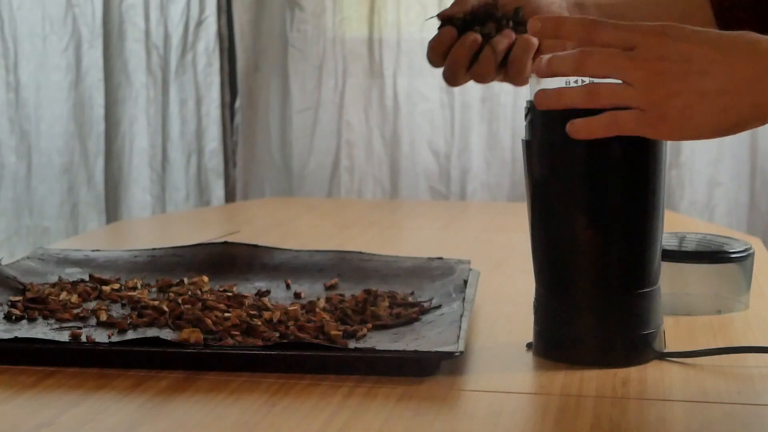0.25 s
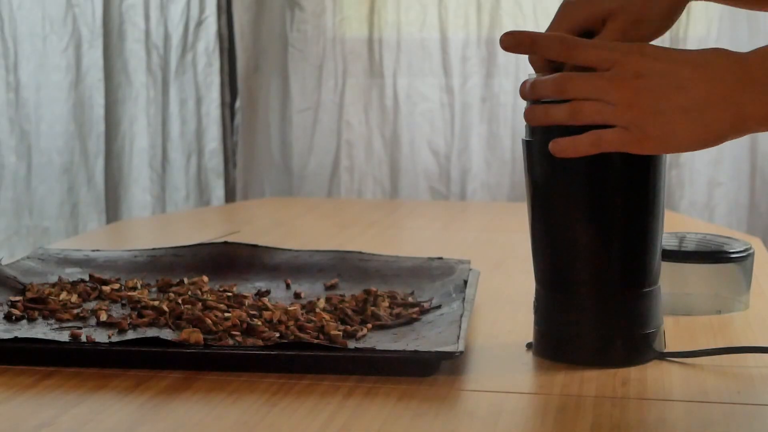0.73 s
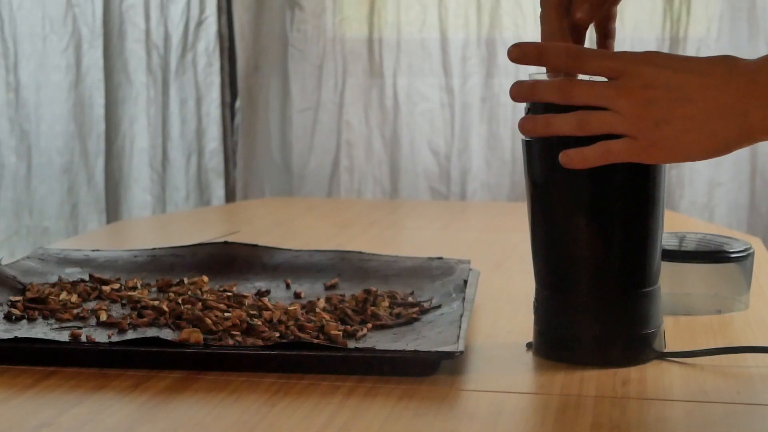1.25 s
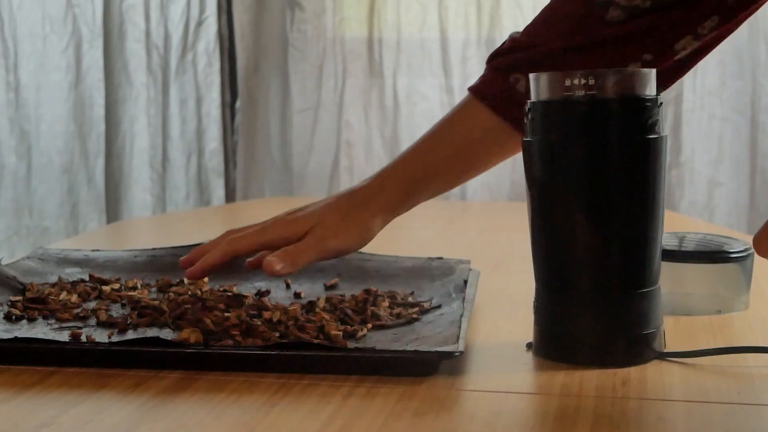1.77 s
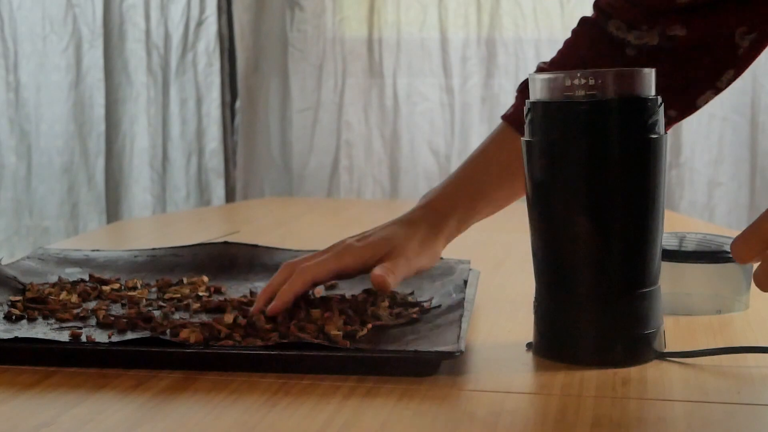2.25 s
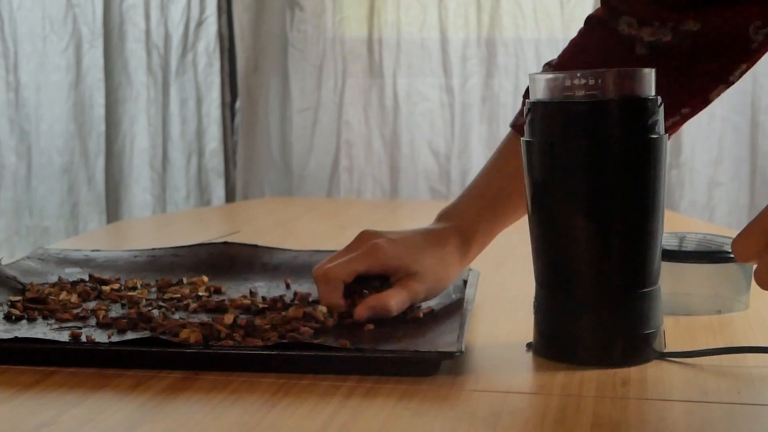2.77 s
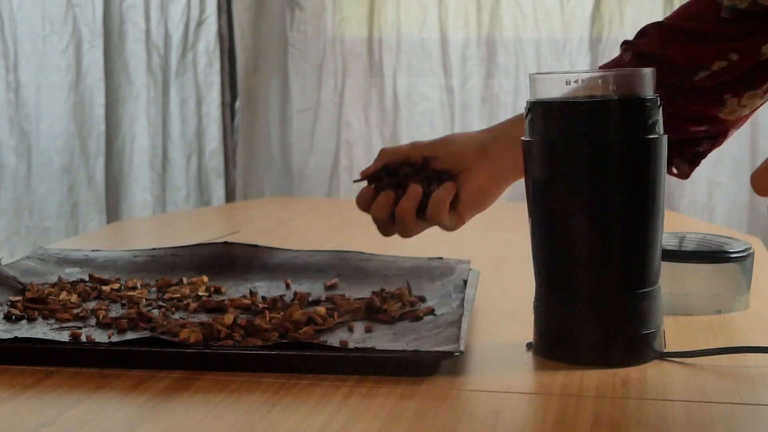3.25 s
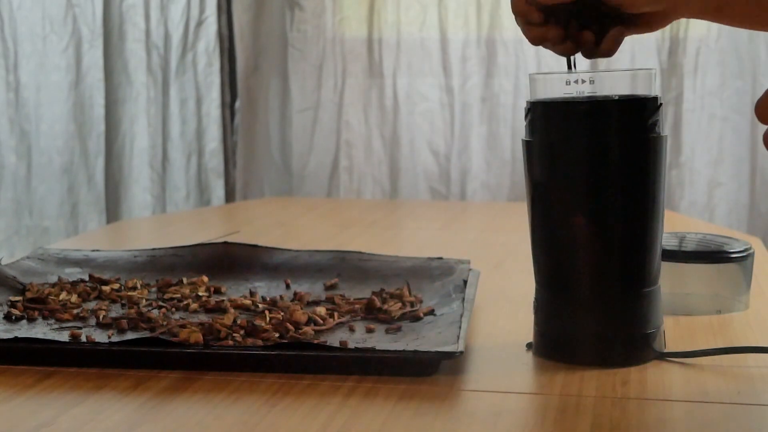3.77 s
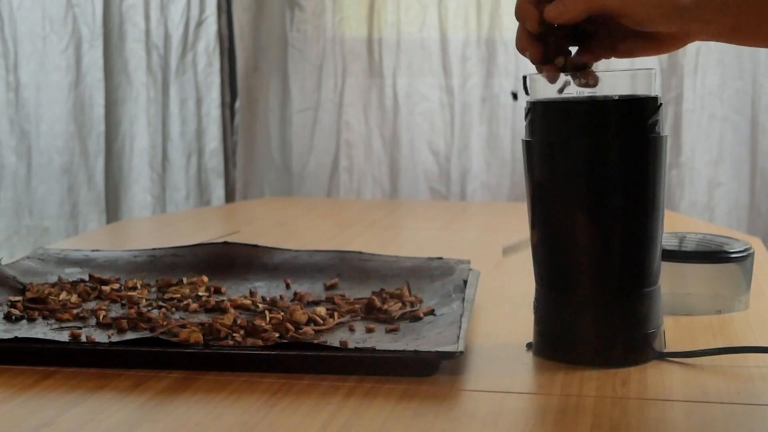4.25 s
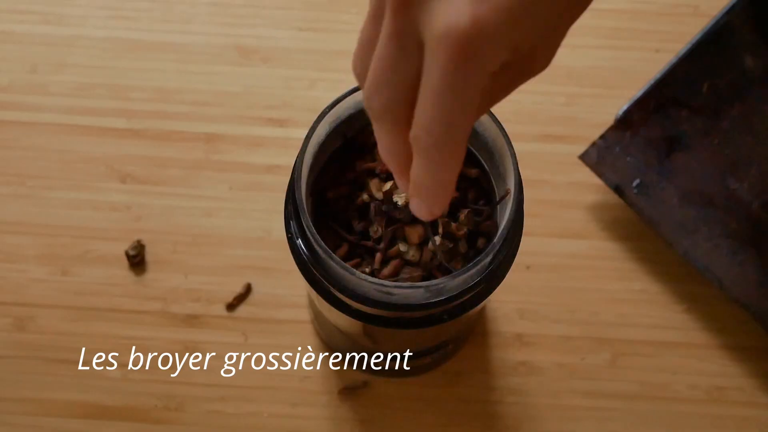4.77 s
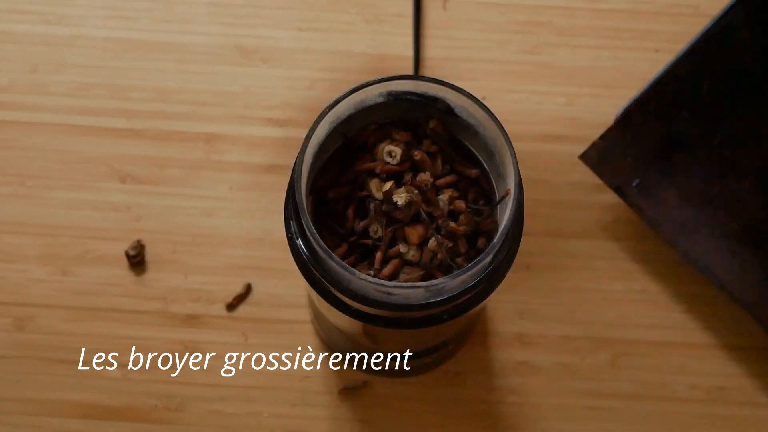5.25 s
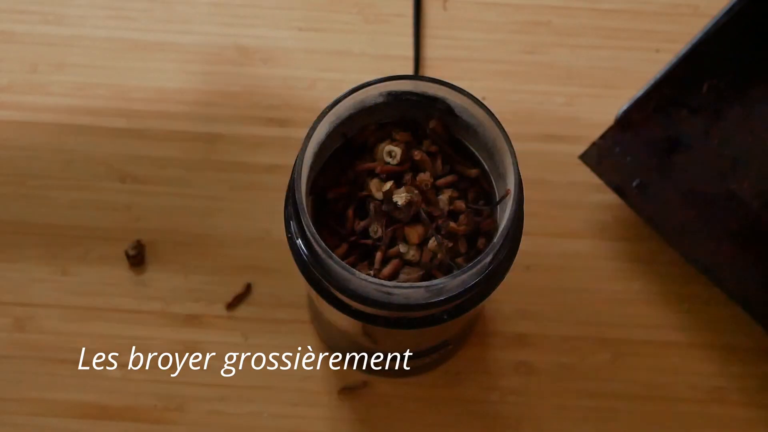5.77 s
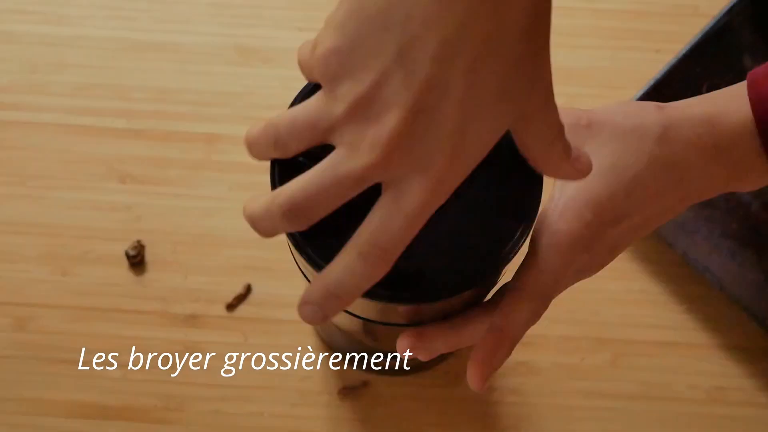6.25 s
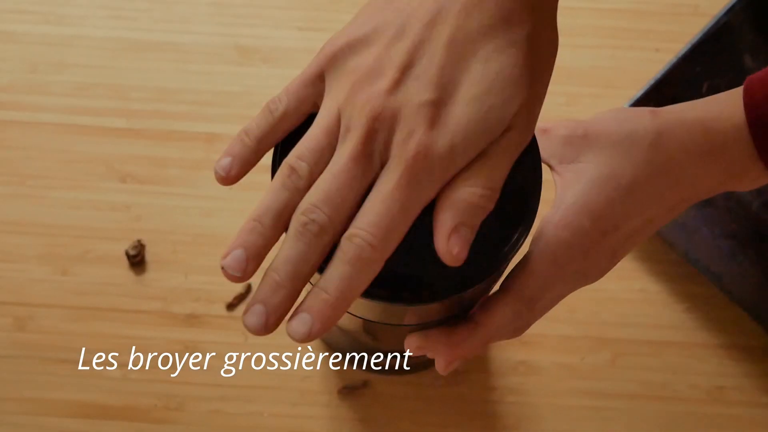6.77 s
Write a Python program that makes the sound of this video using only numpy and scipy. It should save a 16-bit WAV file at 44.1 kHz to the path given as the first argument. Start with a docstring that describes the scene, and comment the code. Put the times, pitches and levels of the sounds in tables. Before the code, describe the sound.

Dry twiggy bits tick and patter into a metal cup, rustle across a tray, bounce on wood, then a hollow lid knocks and snaps shut.

```python
"""Quiet room air and a soft brush of sleeve, then dried root pieces drop by hand into a grinder's steel cup.
A hand sweeps more across a tray and pours them in; strays tick and bounce on the wooden table.
A faint whine joins, the heap crunches, then the plastic lid hoots on the wood, knocks, scrapes and claps home.
Impacts and random grains drive the resonances of cup, tray, board and lid; single pieces are short decaying
sines; the hoot is a sine with one overtone and rubbing noise; air and whine are filtered noise in a live room."""
import sys
import numpy as np
from scipy import signal
from scipy.fft import rfft, irfft
from scipy.io import wavfile

SR = 44100
rng = np.random.default_rng(int(sys.argv[2]) if len(sys.argv) > 2 else 0)


def transcribe(u):
    """Save the signal u as a 16-bit wav file named by the first command-line argument.

    u: samples, shape (n,) or (channels, n), limited to [-1, 1]; the rate is SR.
    q: integer samples, one column per channel.
    """
    v = np.clip(np.atleast_2d(u).T, -1, 1)
    q = np.round(v * 32767).astype(np.int16)
    wavfile.write(sys.argv[1], SR, q)


N = 309141
TIME = np.arange(N) / SR
HIT_ENERGY = 0.004 * SR   # samples in 4 ms: a hit at 0 dB has the energy of rms 1 held for 4 ms


def from_db(db):
    """Decibels to gain."""
    return 10 ** (np.asarray(db) / 20)


def at_hz(points, hz):
    """Read a table on a log-frequency axis."""
    f, value = np.transpose(points)
    return np.interp(np.log(hz + 1e-3), np.log(f), value)


def envelope(rows):
    """Gain that follows a curve of (t/s, level/dB), silent outside it."""
    s, level_db = np.transpose(rows)
    inside = (TIME >= s[0]) & (TIME <= s[-1])
    return from_db(np.interp(TIME, s, level_db)) * inside


def unit(x):
    """Scale to energy 1."""
    return x / np.sqrt(np.sum(x ** 2) + 1e-20)


def body(spectrum, modes=(), size=8192):
    """Causal (minimum-phase) response of an object: a broad colour lifted at its resonances."""
    hz = np.fft.rfftfreq(size, 1 / SR)
    level = from_db(at_hz(spectrum, hz))
    for centre, width, lift_db in modes:
        extra_power = from_db(lift_db) ** 2 - 1
        level = level * np.sqrt(1 + extra_power / (1 + (2 * (hz - centre) / width) ** 2))
    # folding the cepstrum onto positive time makes the response minimum-phase
    cepstrum = irfft(np.log(level))
    cepstrum[1:size // 2] *= 2
    cepstrum[size // 2 + 1:] = 0
    return unit(irfft(np.exp(rfft(cepstrum))))


def split(response, hz):
    """The low and the high part of a response, each of energy 1."""
    parts = []
    for kind in ("low", "high"):
        crossover = signal.butter(N=4, Wn=hz, btype=kind, fs=SR, output="sos")
        parts.append(unit(signal.sosfilt(crossover, response)))
    return parts


def through(x, response):
    """Pass a force or a sound through a response."""
    return signal.oaconvolve(np.atleast_2d(x), np.atleast_2d(response), axes=1)[:, :N]


def grains(per_s, spread_db, clump_db=1.5, clumps_per_s=40):
    """Random tiny contacts of uneven size that come in clumps; rms 1."""
    sizes = from_db(spread_db * np.minimum(rng.exponential(1, N), 4))
    signs = rng.choice([-1, 1], N)
    clumps = np.interp(TIME * clumps_per_s, np.arange(1000), rng.standard_normal(1000))
    touching = rng.random(N) < per_s / SR
    return unit(sizes * signs * from_db(clump_db * clumps) * touching) * np.sqrt(N)


def clicks(times, levels_db):
    """One impulse of force per contact."""
    force = np.zeros(N)
    force[np.round(np.asarray(times) * SR).astype(int)] = from_db(levels_db) * np.sqrt(HIT_ENERGY)
    return force


def blows(rows, response, split_hz, rough, contact_s, rattle_s, size=4096):
    """Each blow is an impact, a rough contact of milliseconds, and a dying rattle of small contacts."""
    t, force = np.arange(size) / SR, np.zeros((2, N + size))
    for s, body_db, crack_db, rattle_db in rows:
        grit, bounces = rng.standard_normal((2, size))
        impact = np.sqrt(1 - rough) * (t == 0)
        scuff = np.sqrt(rough) * unit(grit * np.exp(-t / contact_s))
        rattle = from_db(rattle_db) * unit(bounces ** 3 * np.exp(-t / rattle_s))
        at = round(s * SR)
        # body drives the response below split_hz, crack drives it above
        strength = from_db([[body_db], [crack_db]]) * np.sqrt(HIT_ENERGY)
        force[:, at:at + size] += strength * (impact + scuff + rattle)
    return through(force[:, :N], split(response, split_hz)).sum(axis=0)


def bouncing(rows, loss_db, rattle_db):
    """A piece touches down and rattles; where a gap is given it touches a second time."""
    first = [(s, body_db, crack_db, rattle_db) for s, body_db, crack_db, gap in rows]
    second = [(s + gap, body_db - loss_db, crack_db - loss_db, rattle_db)
              for s, body_db, crack_db, gap in rows if gap > 0]
    return first + second


def pings(times, pitches_hz, levels_db, cycles, size=2048):
    """Single pieces of wood, each ringing for a few cycles at its own pitch."""
    t, out = np.arange(size) / SR, np.zeros(N + size)
    for s, hz, db in zip(times, pitches_hz, levels_db):
        at = round(s * SR)
        ring = unit(np.sin(2 * np.pi * hz * t) * t * np.exp(-hz * t / cycles))
        out[at:at + size] += from_db(db) * ring * np.sqrt(HIT_ENERGY)
    return out[:N]


def pan(x, left_db):
    """Place a sound between the channels; left_db is left minus right."""
    return x * from_db([[left_db / 2], [-left_db / 2]])


# decay time of the room: (f/Hz, t60/s)
ROOM_DECAY = [(150, 0.5), (700, 0.36), (2000, 0.33), (4000, 0.35), (10000, 0.26), (15000, 0.22)]
# reverberant over direct sound, before each source's own wet level: (f/Hz, level/dB)
ROOM_COLOUR = [(100, -2), (300, 1.5), (700, 3.5), (3000, 1), (10000, 1.5), (15000, -1)]
# how alike the reflections are left and right: (f/Hz, likeness 0 to 1)
ROOM_ALIKE = [(150, 0.9), (700, 0.52), (2000, .68), (10000, 0.52)]


def room(x, wet_db, first_s=0.0014, build_s=0.0018, size=26460):
    """Direct sound, then reflections that thicken within milliseconds and die band by band."""
    t, hz = np.arange(size) / SR, np.fft.rfftfreq(size, 1 / SR)
    white, response = rfft(rng.standard_normal((2, size))), np.zeros((2, size))
    swell = 1 - np.exp(-np.maximum(t - first_s, 0) / build_s)
    edges = 62.5 * 2 ** np.arange(0, 8.5, .5)   # half-octave bands
    for low, high in zip(edges, edges[1:]):
        centre = np.sqrt(low * high)
        band = irfft(white * ((hz >= low) & (hz < high)), size)
        mid, side = band * swell * 1e-3 ** (t / at_hz(ROOM_DECAY, centre))
        alike = at_hz(ROOM_ALIKE, centre)
        tail = np.sqrt(1 + alike) * unit(mid) + np.sqrt(1 - alike) * unit(side) * [[1], [-1]]
        response += tail * from_db(wet_db + at_hz(ROOM_COLOUR, centre)) * np.sqrt((high - low) / SR)
    response[:, 0] += 1   # direct sound
    return through(x, response)


# relative colour of the room air: (f/Hz, level/dB)
AIR_COLOUR = [(15, -66), (25, -21), (80, -18.5), (120, -8.5), (256, -6), (326, -3.5), (714, -2.5),
              (1160, -4.5), (1260, -9.5), (1480, -10.5), (2480, -7.5), (4370, -19.5), (4870, -18),
              (14800, -27), (16000, -58)]
# resonances in the room air: (f/Hz, width/Hz, lift/dB)
AIR_RESONANCES = [(932, 156, 4.5), (1630, 260, 6.1), (2543, 140, 7.4)]
# stereo width of the air, side minus mid: (f/Hz, level/dB)
AIR_SIDE = [(60, -11), (110, 10.5), (200, 12.5), (380, 10), (700, 4), (1290, 1), (2380, -2), (4400, -2),
            (8120, -4), (15000, -3)]
AIR_DB, WHINE_START_S = -58, 4.73


def background(later_db=1.5, fade_s=0.038):
    """Wide, quiet room air as shaped noise; later it is a little louder and the whine joins it."""
    mid, side = through(rng.standard_normal((2, N)), body(AIR_COLOUR, AIR_RESONANCES))
    side = irfft(rfft(side) * from_db(at_hz(AIR_SIDE, np.fft.rfftfreq(N, 1 / SR))), N)
    later = np.clip((TIME - WHINE_START_S) / fade_s, 0, 1)
    air = from_db(AIR_DB + later_db * later) * (mid + side * [[1], [-1]])
    return air + later * whine()


# brushes of sleeve and fingers, each swelling and fading: (middle t/s, half length/s, level/dB before trim)
BRUSHES = [(0.025, 0.1, -70), (2.793, 0.091, -58.5), (4.96, 0.036, -56), (5.062, 0.027, -62),
           (5.28, 0.19, -67.5), (5.6, 0.14, -59), (5.906, 0.21, -67), (6.023, 0.034, -57.5)]
# relative colour of cloth and skin: (f/Hz, level/dB)
SLEEVE_COLOUR = [(2060, -39), (3500, -14.5), (8100, -9.5), (10100, -3), (14700, -15.5), (15700, -25),
                 (16000, -52)]


def sleeve():
    """Cloth and skin brush softly as the hands move: dense fine contacts under smooth swells."""
    motion = sum(from_db(db) * np.exp(-((TIME - s) / half_s) ** 2) for s, half_s, db in BRUSHES)
    return from_db(-2.0) * through(motion * grains(per_s=5500, spread_db=5.5), body(SLEEVE_COLOUR))


# larger pieces landing, before trim: (t/s, body level/dB, crack level/dB, gap to second touch/s or 0)
CUP_LANDINGS = [(0.2484, -65, -49.5, 0.0099), (0.287, -46.5, -62, 0), (0.363, -66, -54, 0),
                (0.473, -51, -53, 0), (0.681, -53, -41, 0.00048), (0.6931, -33.5, -45, 0.0058),
                (0.7214, -39, -40, 0.0035), (0.8426, -37, -50, 0.00093), (0.873, -35, -42, 0),
                (0.895, -31, -29.5, 0.0117), (0.9464, -29, -32, 0), (1.1223, -31.5, -36, 0),
                (1.285, -49.5, -46.5, 0.007), (3.89, -43.5, -37, 0.0037), (3.9116, -29.5, -27, 0),
                (4.0545, -38.5, -39, 0.024), (4.149, -37.5, -33.5, 0.014), (4.2161, -39, -32, 0.015),
                (4.27, -34, -38, 0.015), (4.3203, -27, -35, 0.008), (4.6129, -37.5, -32.5, 0.012)]
# heavier chunks that sound the hollow of the cup: (t/s, f/Hz, level/dB)
HOLLOW_CHUNKS = [(0.684, 595, -52), (0.696, 640, -46.5), (0.707, 634, -53), (0.995, 626, -48),
                 (1.288, 542, -53.5)]
# fingers pressing the heap down: (t/s, body level/dB, crack level/dB, rattle level/dB over contact)
HEAP_CRUNCHES = [(4.7295, -42, -35, -8), (4.734, -31.5, -30, -4.5), (4.747, -58, -37, -9),
                 (4.774, -43, -34.5, -4)]
# relative colour of the steel cup: (f/Hz, level/dB)
CUP_COLOUR = [(100, -26), (330, -16), (560, -5.5), (880, -8), (1200, -18), (2150, -14), (2650, -1),
              (3700, 0.5), (5000, -9), (7500, -5.5), (10200, -2), (12500, -10), (16000, -32)]
# resonances of the steel cup: (f/Hz, width/Hz, lift/dB)
CUP_RESONANCES = [(2650, 38, 7), (2930, 200, 1), (3430, 294, 2.5), (8750, 320, -1)]


def cup():
    """Larger pieces land one by one on steel, chunks knock hollowly, and the heap crunches under the fingers."""
    steel = body(CUP_COLOUR, CUP_RESONANCES)
    touches = bouncing(CUP_LANDINGS, loss_db=-0.2, rattle_db=-4.0)
    landings = blows(touches, steel, split_hz=5150, rough=0.95, contact_s=0.0011, rattle_s=0.018)
    crunch = blows(HEAP_CRUNCHES, steel, split_hz=4500, rough=0.98, contact_s=0.0051, rattle_s=0.021)
    chunks = pings(*np.transpose(HOLLOW_CHUNKS), cycles=1.9)
    return pan(from_db(-8) * landings + crunch + chunks, left_db=.2)


# handfuls trickling into the cup: (hand opens t/s, hand is empty t/s, level/dB before trim)
HANDFULS = [(0.891, 1.046, -37), (1.346, 1.42, -65), (4.035, 4.05, -53.5), (4.175, 4.585, -46.5)]
POUR_RISE_DB_PER_S, POUR_FALL_DB_PER_S = 319, 124   # the first crumbs slip out early, the last ones straggle


def trickle():
    """Dry pieces patter on cup and heap: the stream builds, holds while the hand empties, and dies away."""
    flow = np.zeros(N)
    for opens, empty, db in HANDFULS:
        early_db = POUR_RISE_DB_PER_S * np.maximum(opens - TIME, 0)
        late_db = POUR_FALL_DB_PER_S * np.maximum(TIME - empty, 0)
        flow += from_db(db - early_db - late_db)
    patter = flow * grains(per_s=4000, spread_db=3.5, clump_db=4, clumps_per_s=70)
    return from_db(-1.0) * through(patter, body(CUP_COLOUR, CUP_RESONANCES))


# one sweep of the hand: digs in, drags evenly, closes and lifts the pieces off: (t/s, level/dB before trims)
HAND_SWEEP = [(1.935, -70), (1.972, -46), (2.1, -35.5), (2.29, -42), (2.62, -42.5), (2.82, -41.5),
              (3.0, -56.5), (3.29, -58), (3.43, -86)]
# relative colour of the tray: (f/Hz, level/dB)
TRAY_COLOUR = [(59, -56), (100, -40), (255, -4), (343, -7), (373, -5.5), (608, -7.5), (970, -0.5),
               (1150, -5.5), (1310, -4.5), (1520, -5.5), (1830, -7), (7940, -18), (10500, -11),
               (14100, -30), (16000, -65)]
# resonances of the tray: (f/Hz, width/Hz, lift/dB)
TRAY_RESONANCES = [(383.4, 17, 8), (830, 50, 3), (970, 91, 3), (1090, 67, 2.5)]
# where the tray leans, left minus right: (f/Hz, level/dB)
TRAY_LEAN = [(60, -0.5), (110, -10), (200, -12), (380, -8.5), (700, -2), (1290, -0.5), (2380, 0.5),
             (4400, 0), (8120, 1.5), (15000, 1)]
CRACKLE_DB, CRACKLE_FOLLOWS = -14.5, 0.88   # edge crackle at scrape gain 1, before trim; share of scrape's swing


def tray(count=220):
    """Pieces dragged over the tray make it murmur; they tip over with small knocks and their edges crackle."""
    scrape = envelope(HAND_SWEEP)
    edges = from_db(CRACKLE_DB) * scrape ** CRACKLE_FOLLOWS
    low, high = split(body(TRAY_COLOUR, TRAY_RESONANCES), hz=3940)
    when, pitch, size = rng.random((count, 3)).T
    start_s, end_s = HAND_SWEEP[0][0], HAND_SWEEP[-1][0]
    # pitches spread from 330 to 2970 Hz, the higher ones softer
    knocks = pings(start_s + when * (end_s - start_s), 330 * 9 ** pitch, -6 * size - 7 * pitch, cycles=1.1)
    murmur = through(scrape * grains(per_s=1100, spread_db=2.5, clump_db=2.0), low)
    crackle = through(edges * grains(per_s=1000, spread_db=1.5, clump_db=1.5), high)
    sound = from_db(-1.0) * scrape * knocks + from_db(-5.5) * murmur + from_db(-2.0) * crackle
    lean_db = at_hz(TRAY_LEAN, np.fft.rfftfreq(2 * N, 1 / SR)) / 2
    return irfft(rfft(sound, 2 * N) * from_db([lean_db, -lean_db]))[:, :N]


# dry snaps of twigs and of the plastic lid, before trim: (t/s, body level/dB, crack level/dB)
DRY_SNAPS = [(2.7831, -37, -34), (2.8639, -52, -39.5), (6.2427, -43, -45), (6.7257, -37, -43.5),
             (6.774, -44.5, -49), (6.9367, -44.5, -53), (6.971, -44, -37), (6.978, -29.5, -30.5)]
# relative colour of thin plastic, also heard in the lid's slide: (f/Hz, level/dB)
PLASTIC_COLOUR = [(88, -24), (150, 3), (923, -3.5), (1390, -9.5), (2450, -5), (3040, -9.5), (4240, -4.5),
                  (7620, -5), (10400, 5.5), (16000, -19)]


def snaps(rattle_db=-2.0):
    """Short bright snaps of dry twigs and of plastic under strain, as rough impacts on one bright response."""
    rows = [(*snap, rattle_db) for snap in DRY_SNAPS]
    plastic = body(PLASTIC_COLOUR)
    snapping = blows(rows, plastic, split_hz=7600, rough=0.54, contact_s=0.00092, rattle_s=0.008)
    return pan(from_db(-9.0) * snapping, left_db=.8)


# stray twigs tumbling on the table: (t/s, first f/Hz, level/dB)
TWIG_TUMBLES = [(3.604, 1150, -49.5), (4.38, 2230, -39), (4.461, 2280, -32)]
TUMBLE_GAP_S, TUMBLE_LOSS_DB, TUMBLE_SAG_OCTAVES = 0.0135, 4.5, 0.43   # from one bounce to the next


def tumbling(count=6):
    """A twig bounces at an even pace, softer and lower each time: (times, pitches, levels)."""
    bounces = []
    for s, hz, db in TWIG_TUMBLES:
        for k in range(count):
            pitch_hz = hz * 2 ** (-k * TUMBLE_SAG_OCTAVES)
            bounces.append((s + k * TUMBLE_GAP_S, pitch_hz, db - k * TUMBLE_LOSS_DB))
    return np.transpose(bounces)


# stray pieces hitting the table, before trim: (t/s, body level/dB, crack level/dB, gap to second touch/s or 0)
STRAY_HITS = [(3.603, -38, -48, 0.018), (4.378, -38, -25, 0.011), (4.459, -46, -23.5, 0.000019),
              (4.506, -34, -33, 0.0024), (4.535, -40, -38, 0.001), (4.595, -38.5, -46, 0.0064)]
# relative colour of the wooden board: (f/Hz, level/dB)
BOARD_COLOUR = [(150, -18), (600, -17), (950, 0.5), (1800, -4.5), (3000, -8), (6000, -7.5), (8000, -9),
                (10000, -3.5), (12500, -11), (16000, -32)]
# resonances of the wooden board: (f/Hz, width/Hz, lift/dB)
BOARD_RESONANCES = [(980.4, 96, 5.75), (1612, 170, 4.2), (8897, 112, 3.5), (9850, 170, 8.2),
                    (10800, 120, 5.5)]


def strays():
    """Pieces that miss the cup tick and bounce on the wood."""
    touches = bouncing(STRAY_HITS, loss_db=6.5, rattle_db=-7)
    board = body(BOARD_COLOUR, BOARD_RESONANCES)
    ticks = blows(touches, board, split_hz=3650, rough=0.83, contact_s=0.0027, rattle_s=0.0055)
    return pan(from_db(-3) * ticks + pings(*tumbling(), cycles=0.79), left_db=0.1)


# partials of the whining appliance: (f/Hz, width/Hz, relative level/dB)
WHINE_PARTIALS = [(908.4, 9.3, 2), (1065, 7.3, -8), (2030, 23, -8.5), (2430, 60, -5), (2966, 45, -9.5)]


def whine(level_db=-60, size=22050):
    """A distant appliance: turbulence through a few narrow resonances gives a wavering tone."""
    t, ring = np.arange(size) / SR, np.zeros(size)
    for hz, width, db in WHINE_PARTIALS:
        ring += from_db(db) * unit(np.sin(2 * np.pi * hz * t) * np.exp(-np.pi * width * t))
    return from_db(level_db) * through(rng.standard_normal((2, N)), ring)


# soft thuds through the grinder into the table: (t/s, thud level/dB, ring drive level/dB before trim)
TABLE_THUDS = [(4.733, -49, -56), (5.757, -60, -30), (6.2902, -25.5, -32), (6.337, -46, -33.5),
               (6.731, -67, -52.5)]
# relative colour of a thud: (f/Hz, level/dB)
THUD_COLOUR = [(25, -16), (80, -18), (150, -4), (230, -3), (450, 8), (800, -14), (2000, -15), (12000, -63)]
# ringing modes of the table top: (f/Hz, relative level/dB, t60/s)
TABLE_RING = [(129.3, -6.5, 0.84), (191.5, 4, 0.51), (230, -6.5, 0.55), (300, -5.5, 0.43), (422, -13, 0.78)]


def table():
    """A push on the table top gives a thud and leaves its low modes ringing."""
    s, thud_db, ring_db = np.transpose(TABLE_THUDS)
    t, ring = TIME[:SR], np.zeros(SR)
    for hz, db, t60 in TABLE_RING:
        ring += from_db(db) * np.sin(2 * np.pi * hz * t) * 1e-3 ** (t / t60)
    # the top radiates little below its first mode
    low_cut = signal.butter(N=4, Wn=100, btype="high", fs=SR, output="sos")
    ring = signal.sosfilt(low_cut, ring)
    thuds = through(clicks(s, thud_db), body(THUD_COLOUR))
    ringing = from_db(-30.0) * through(clicks(s, ring_db), ring)
    return pan(thuds + ringing, left_db=-5.0)


def judder(start_s=5.693, end_s=5.752, rise_s=0.017, fall_s=0.0093, pitch_hz=309, level_db=-31.5):
    """The lid's rim sticks and slips on the wood in a short, nearly pure hoot."""
    grip = np.clip((TIME - start_s) / rise_s, 0, 1) * np.clip((end_s - TIME) / fall_s, 0, 1)
    phase = 2 * np.pi * pitch_hz * (TIME - start_s)
    # relative colour of the rubbing: (f/Hz, level/dB)
    wood = body([(40, -28), (300, -2), (520, -3), (750, -22), (3000, -37), (12000, -45)])
    rub = through(grains(per_s=1500, spread_db=2.5), wood)
    hoot = np.sin(phase) + from_db(-22) * np.sin(2 * phase) + from_db(-12) * rub
    return pan(from_db(level_db) * grip * hoot, left_db=-1.5)


# lid knocking on the table: (t/s, body level/dB, crack level/dB, rattle level/dB over contact)
LID_KNOCKS = [(5.705, -43, -52, -3), (5.755, -26.5, -36.5, -3), (5.759, -27.5, -37, -8),
              (5.765, -27.5, -58, 3)]
# relative colour of lid on table: (f/Hz, level/dB)
KNOCK_COLOUR = [(30, -53), (70, -40), (125, 0.5), (240, -5.5), (330, 0.5), (450, -6), (650, -12),
                (830, -21.5), (1550, -20), (3000, -28.5), (7900, -43), (10800, -42), (16000, -71)]
# resonances of lid on table: (f/Hz, width/Hz, lift/dB)
KNOCK_RESONANCES = [(312, 30, 8.6), (488, 30, 3.7), (643, 37, 6.2), (1070, 50, 11), (1490, 110, 6.2),
                    (1940, 290, 7.4)]
# lid clapped on the grinder: (t/s, body level/dB, crack level/dB, rattle level/dB over contact)
LID_CLAPS = [(6.2895, -28, -39, 0), (6.3355, -20.5, -22.5, -16), (6.3415, -17, -32, -13),
             (6.3825, -23.5, -26.5, -3.5)]
# relative colour of lid on grinder: (f/Hz, level/dB)
LID_COLOUR = [(40, -18), (150, -12.5), (200, 4.5), (330, -0.5), (560, -2), (860, -1.5), (1200, -7.5),
              (1550, -1), (1950, -8.5), (2400, -17.5), (7500, -20), (10300, -17.5), (13000, -29),
              (16000, -50)]
# resonances of lid on grinder: (f/Hz, width/Hz, lift/dB)
LID_RESONANCES = [(505, 38, 5.5), (710, 30, 4), (850, 22, 5.5), (890, 19, 5), (1150, 54, 6.9),
                  (1305, 18, 4.6), (1496, 32, 6.4), (1680, 67, 2.7), (1850, 48, 3.4)]


def lid():
    """The hollow plastic lid knocks on the table, then meets the grinder softly and claps home."""
    on_table, on_grinder = body(KNOCK_COLOUR, KNOCK_RESONANCES), body(LID_COLOUR, LID_RESONANCES)
    knock = blows(LID_KNOCKS, on_table, split_hz=2830, rough=0.59, contact_s=0.0033, rattle_s=0.0043)
    clap = blows(LID_CLAPS, on_grinder, split_hz=2260, rough=0.89, contact_s=0.0026, rattle_s=0.008)
    return pan(knock, left_db=1.2) + pan(clap, left_db=0.5)


def slide(start_s=5.8, end_s=6.29, level_db=-44, rise_db_per_s=170):
    """The lid's edge scrapes along the rim, harder and harder until it seats."""
    start_db = level_db - rise_db_per_s * (end_s - start_s)
    push = envelope([(start_s, start_db), (end_s, level_db)])
    return through(push * grains(per_s=2500, spread_db=5), body(PLASTIC_COLOUR))


def scene():
    """Sources meet the room through reflections of their own; the broad table top is heard directly."""
    hands = room(sleeve(), wet_db=1.0)
    in_cup = room(cup(), wet_db=-1.0) + room(trickle(), wet_db=-1.0)
    outside_cup = room(tray(), wet_db=-1.5) + room(strays(), wet_db=1.5)
    grinder = room(lid() + slide() + snaps(), wet_db=-0.6) + room(judder(), wet_db=1.0) + table()
    return background() + hands + in_cup + outside_cup + grinder


def record(dry, notch_hz=7850, cutoff_hz=15550):
    """A narrow notch in the treble, and a steep cut of the top."""
    notched = signal.lfilter(*signal.iirnotch(notch_hz, 25, fs=SR), dry)
    top_cut = signal.ellip(10, .2, 80, cutoff_hz, fs=SR, output="sos")
    return signal.sosfilt(top_cut, notched)


dry = scene()
out = record(dry)
transcribe(out)
```